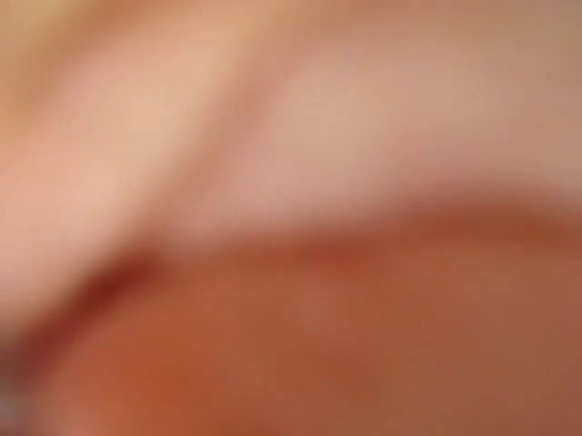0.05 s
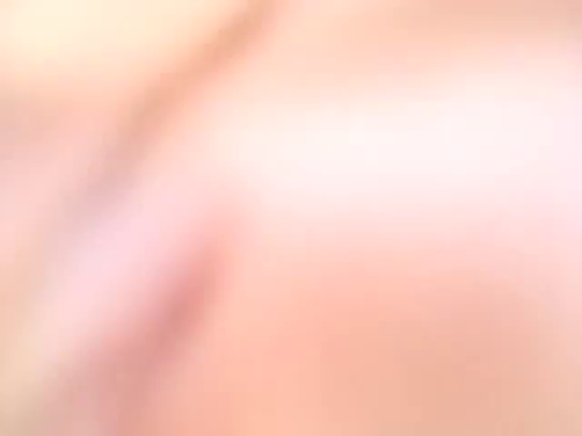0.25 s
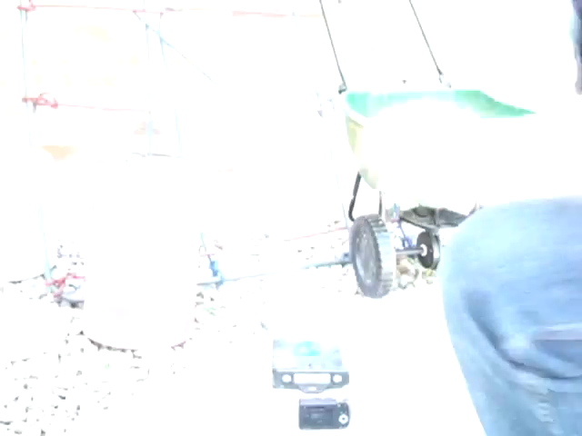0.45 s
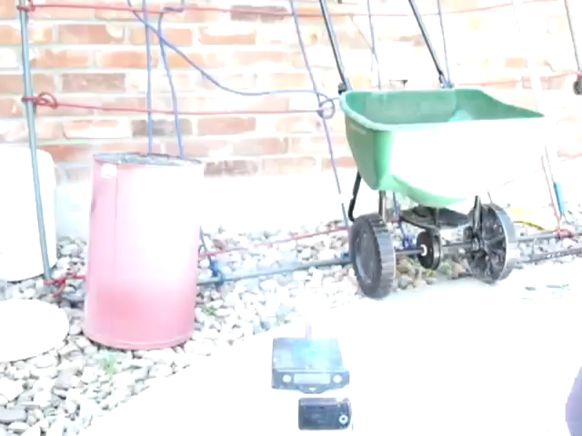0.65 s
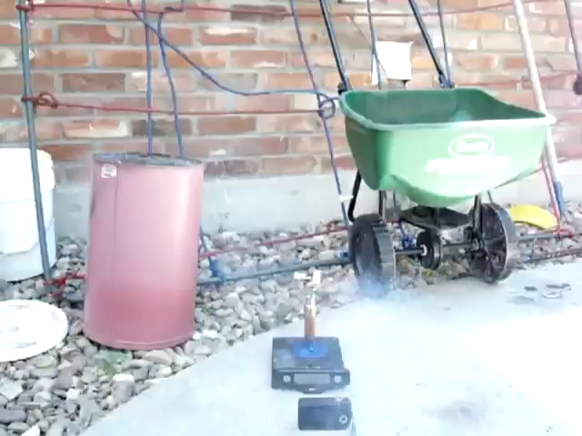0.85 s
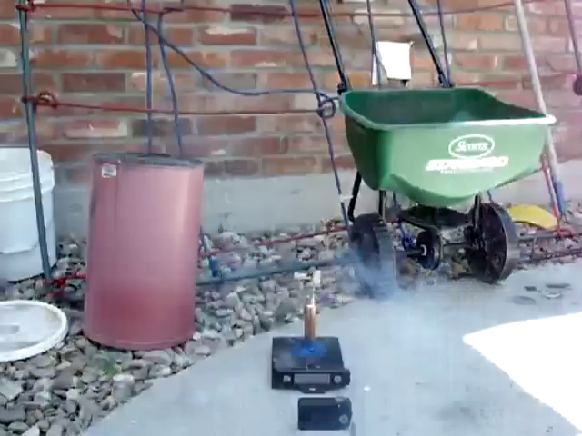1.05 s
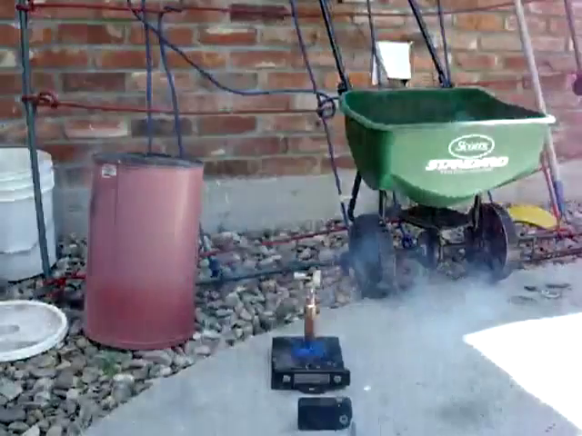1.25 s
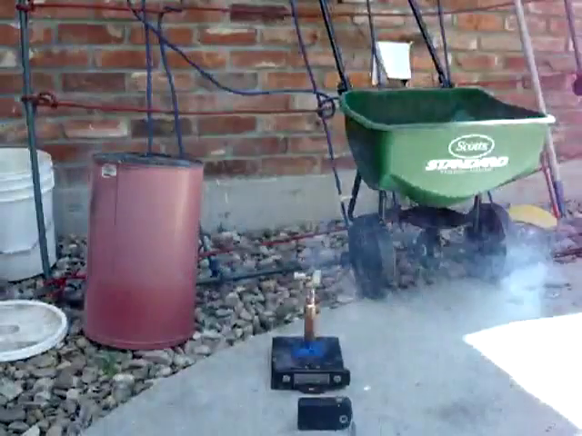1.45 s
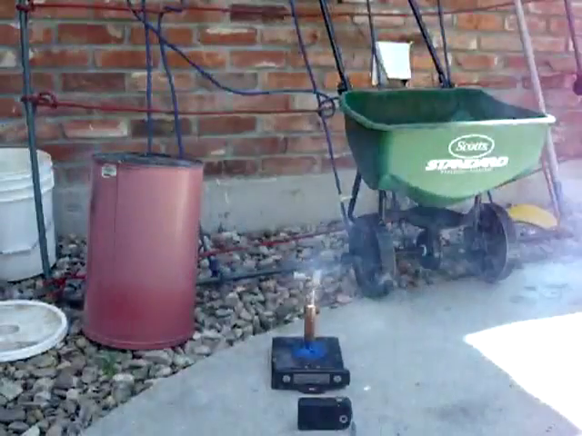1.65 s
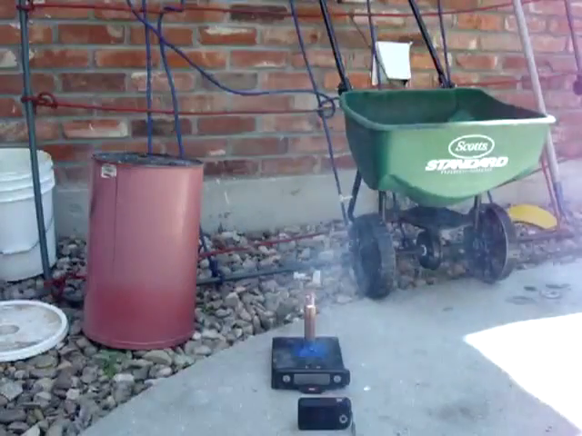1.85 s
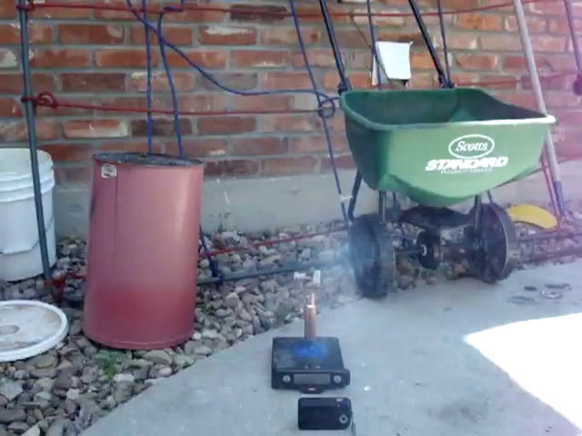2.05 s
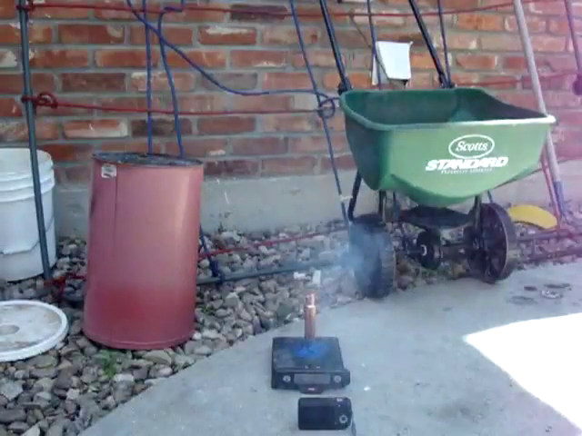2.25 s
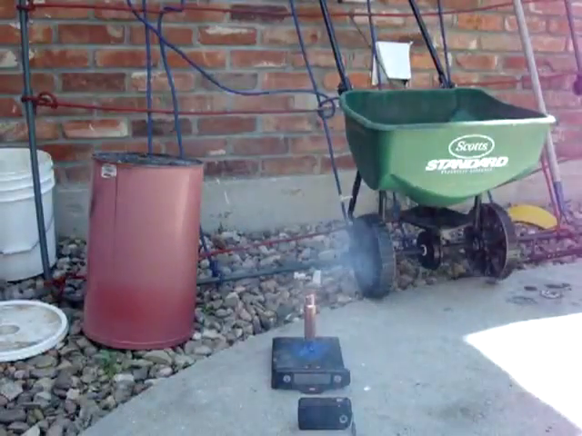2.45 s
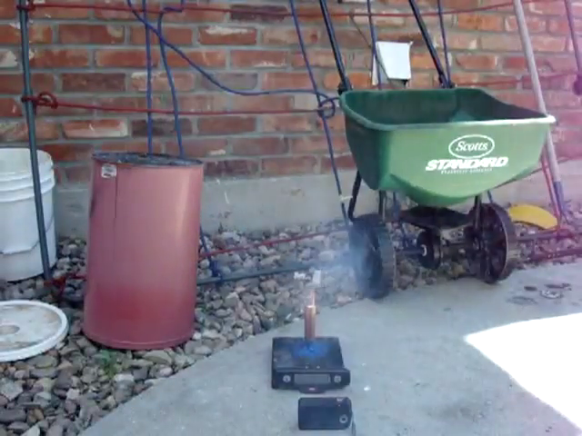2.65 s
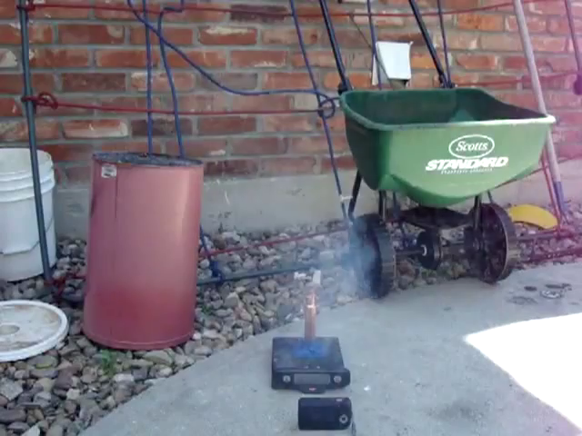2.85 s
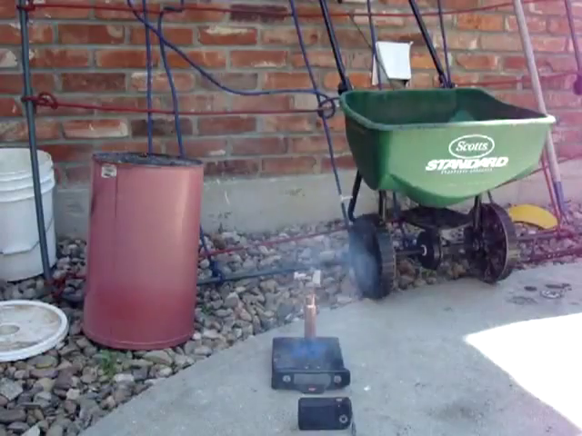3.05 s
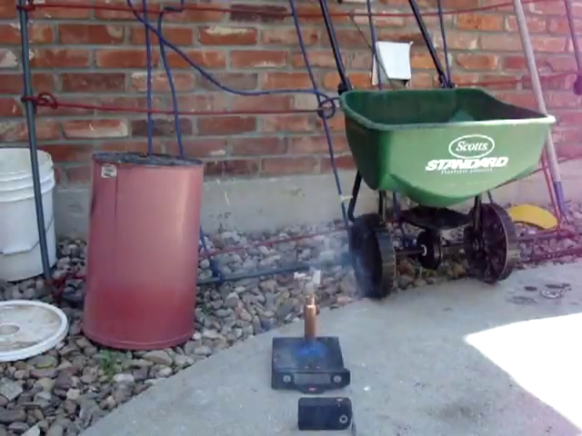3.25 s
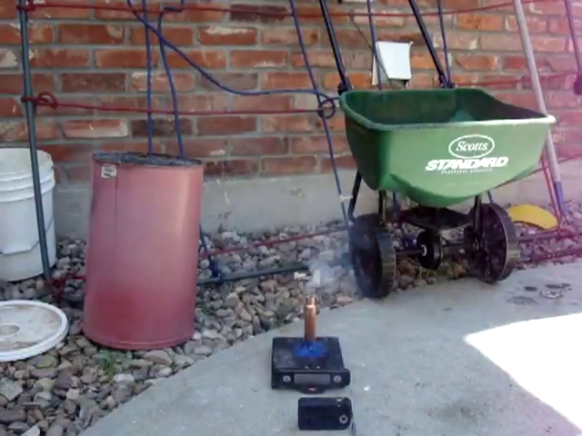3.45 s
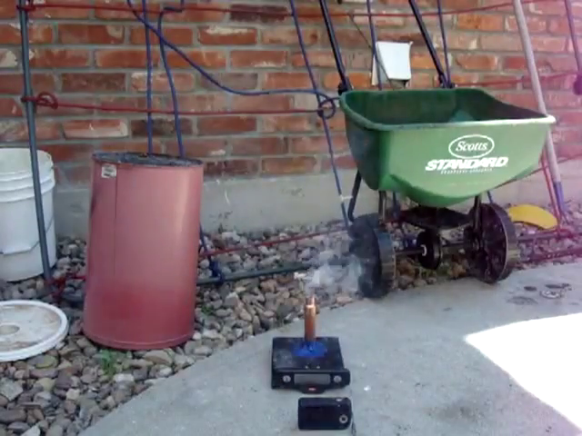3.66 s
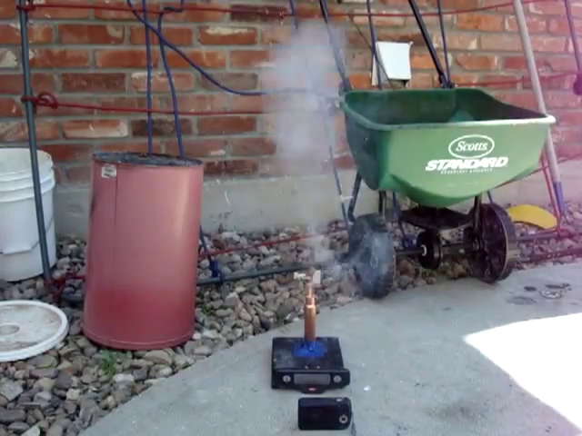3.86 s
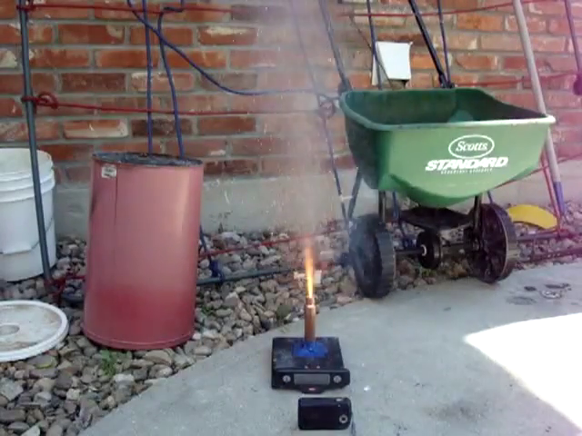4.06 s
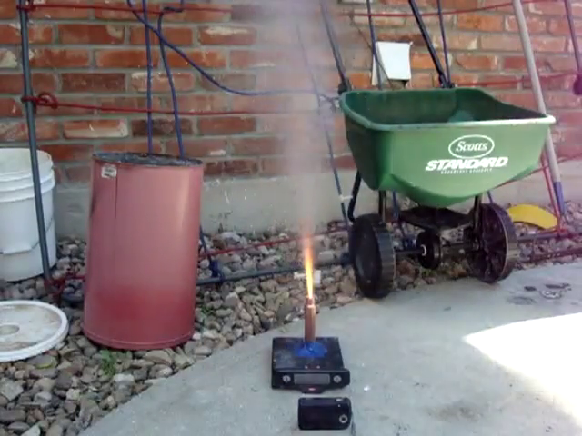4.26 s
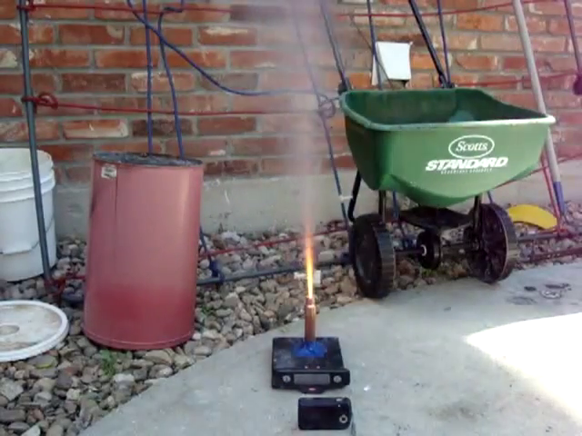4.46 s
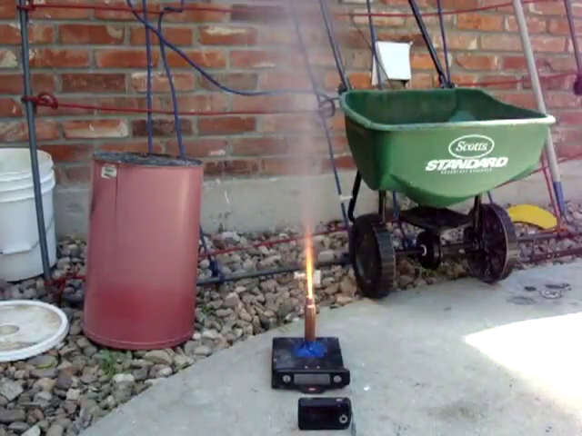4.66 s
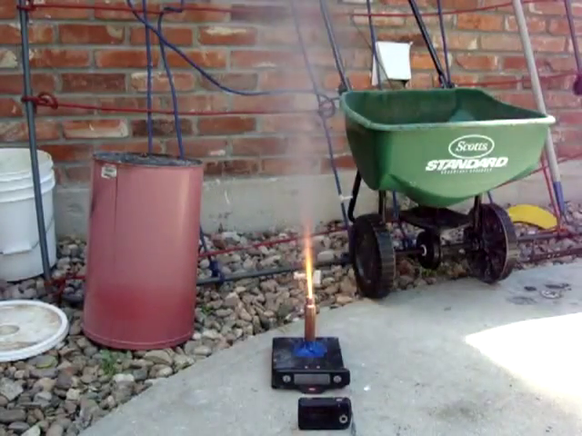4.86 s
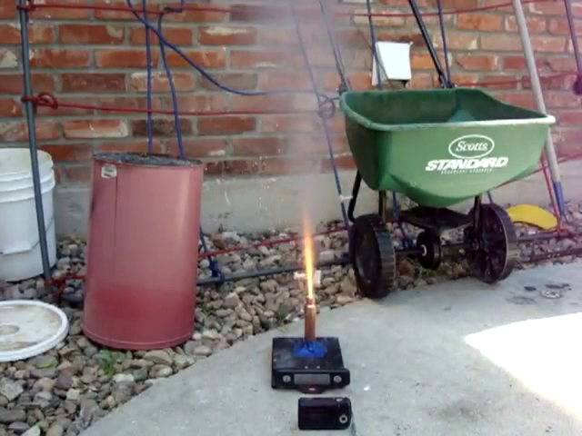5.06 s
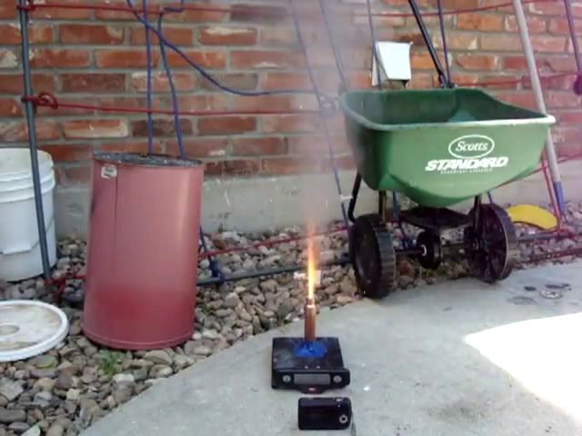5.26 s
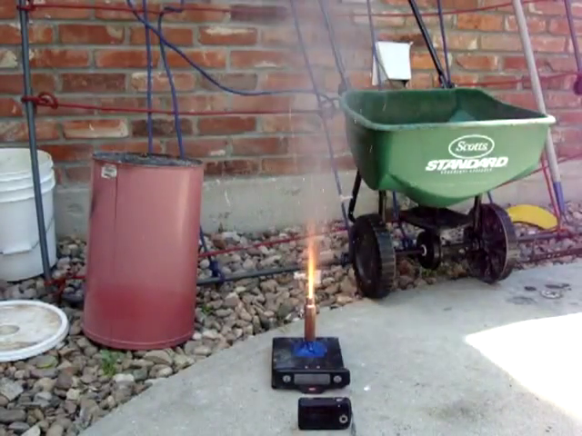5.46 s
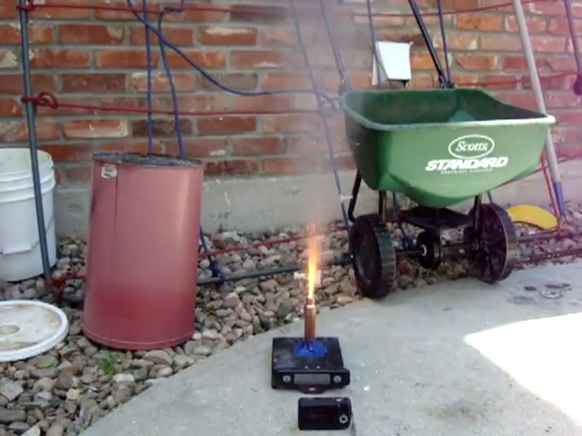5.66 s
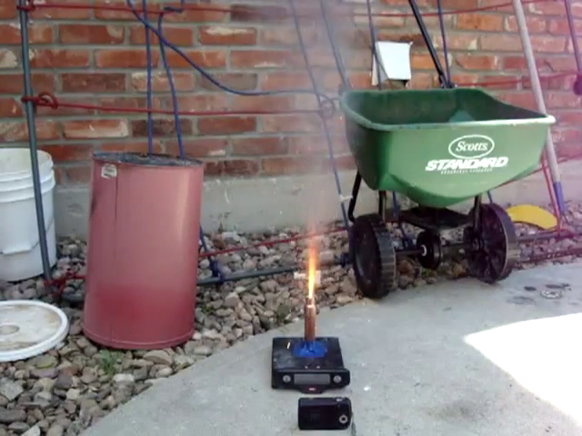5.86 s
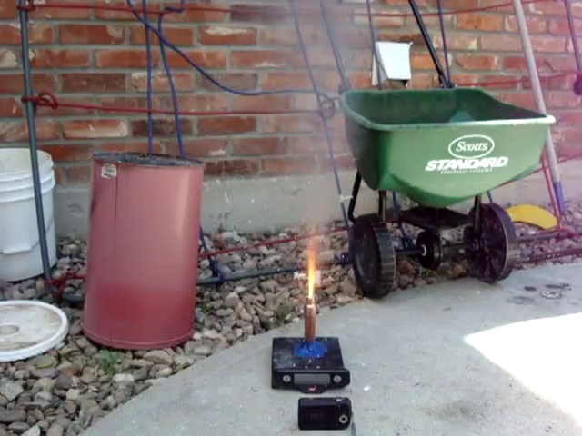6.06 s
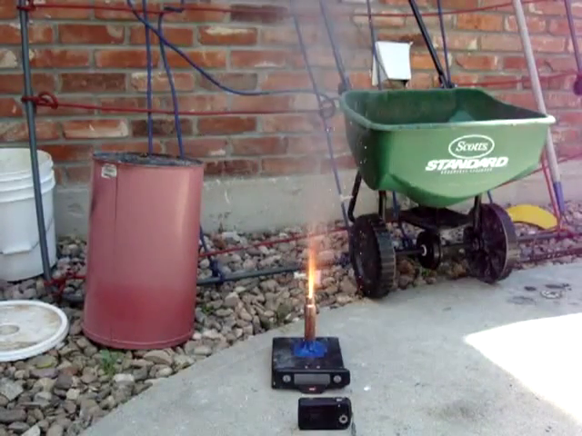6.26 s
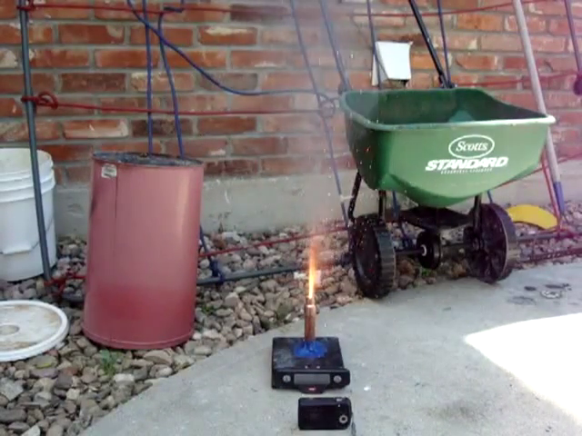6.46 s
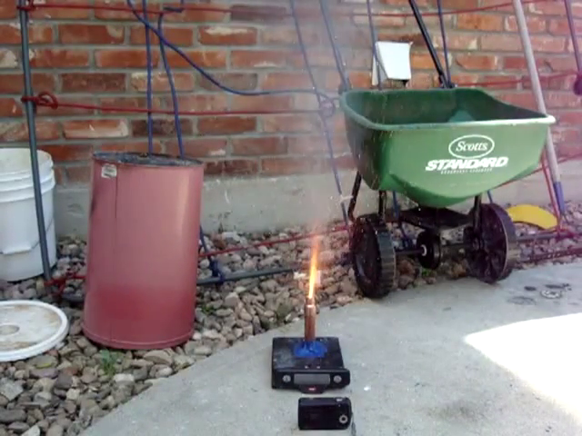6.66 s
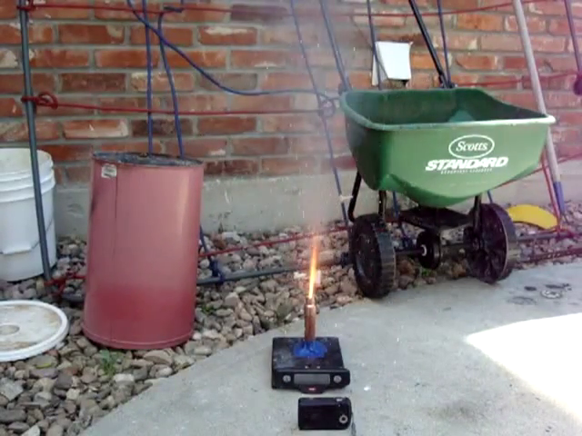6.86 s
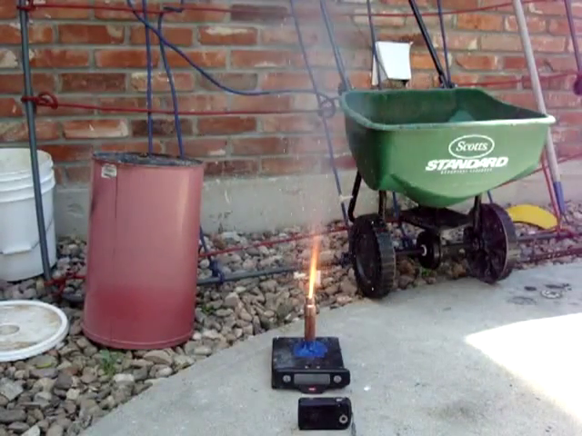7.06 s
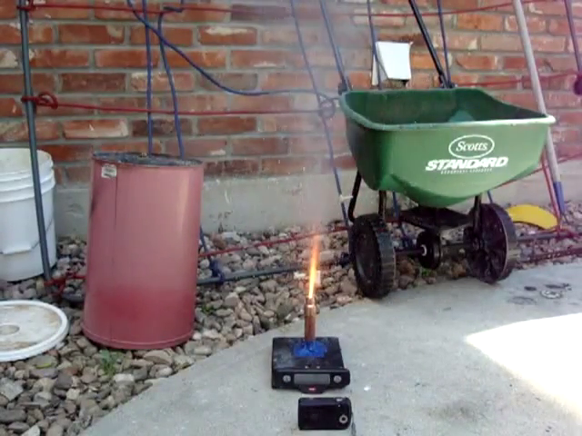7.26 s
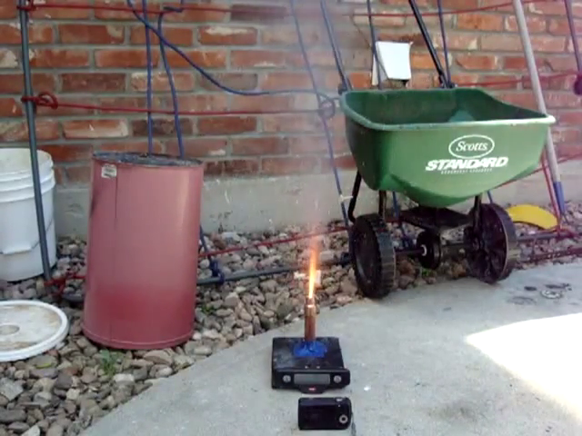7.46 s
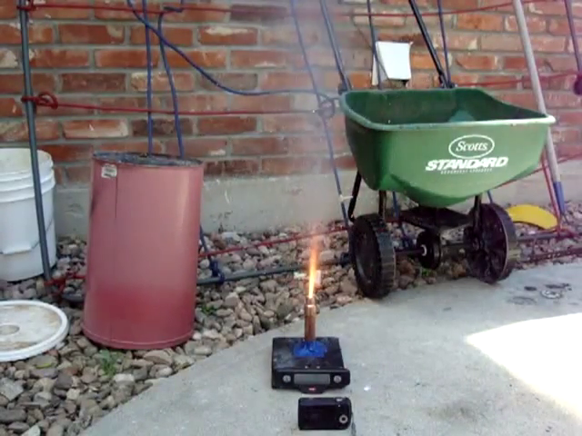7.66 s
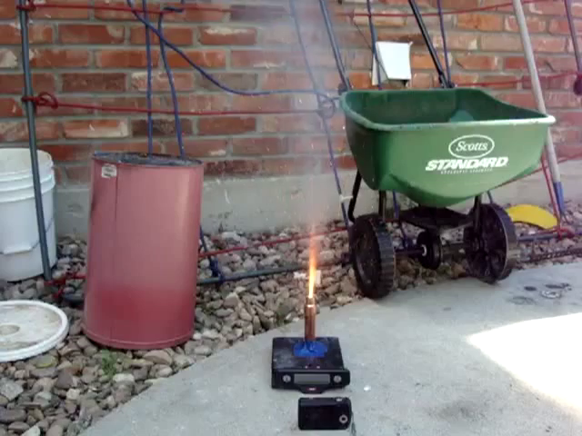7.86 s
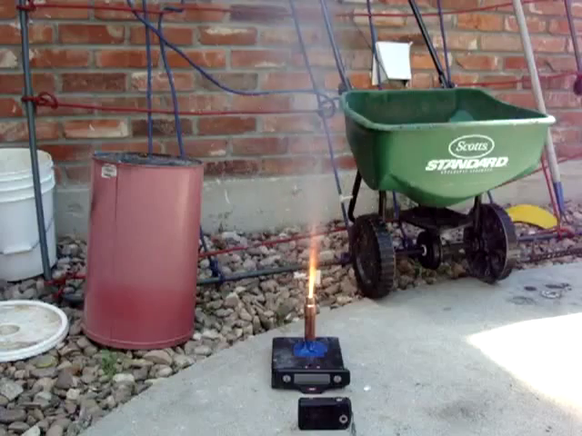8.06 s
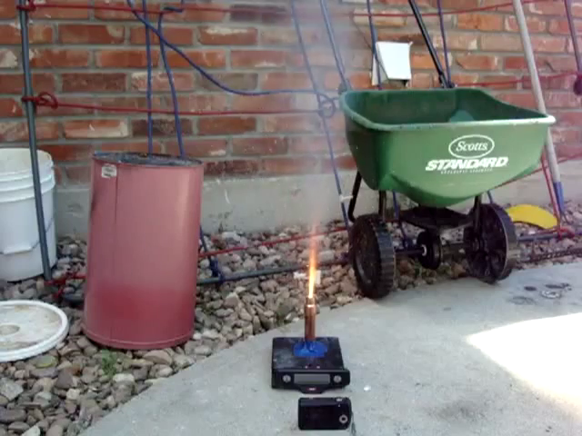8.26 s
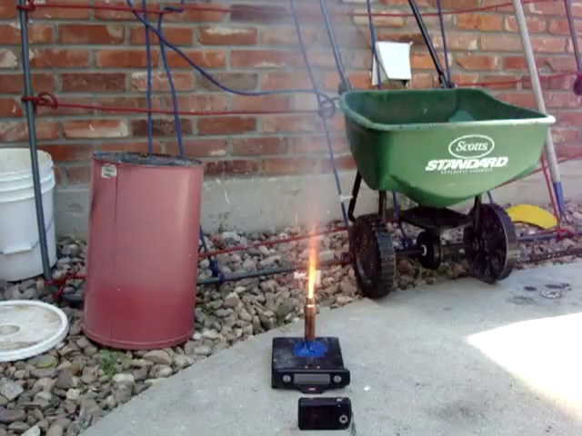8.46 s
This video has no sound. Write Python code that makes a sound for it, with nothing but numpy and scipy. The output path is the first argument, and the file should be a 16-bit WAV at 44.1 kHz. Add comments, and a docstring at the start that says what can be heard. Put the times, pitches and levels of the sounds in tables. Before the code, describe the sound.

Fizzing fuse flares and hard footsteps on a patio, a hollow hiss, then a sudden blast and steady roaring jet of burning fuel.

```python
"""Small rocket motor on a patio

Place: a concrete patio beside a brick wall, a small rocket motor fired on a scale, one microphone.
The fuse, spitting noise in flares, hisses while someone steps and shuffles away: bursts into sole modes, crushed grit.
It burns down into the hollow nozzle, where resonances colour the hiss; then a push of gas and a blast.
The jet lights with a sudden bright, sputtering hiss and roar, shaped from noise and specks.
Far off, the hum of the yard sinks away; electrical bumps and a 30 Hz ripple, probably the camera's supply, are added."""
import sys
import numpy as np
from scipy import signal
from scipy.fft import rfft, irfft, next_fast_len
from scipy.io import wavfile

SR = 44100
rng = np.random.default_rng(int(sys.argv[2]) if len(sys.argv) > 2 else 0)


def invert_db(x):
    """Field ratio 10**(x/20) for x, a level in decibels (scalar or array-like)."""
    u = np.asarray(x, float) / 20
    return 10 ** u


def int16_out(signal):
    """Quantize to a 16-bit WAV file."""
    q = np.round(np.clip(np.atleast_2d(signal).T, -1, 1) * 32767)
    wavfile.write(sys.argv[1], SR, q.astype(np.int16))


N = 375732

# All *_COLOUR tables are relative spectra: (frequency [Hz], density [dB per Hz])

# The jet: (time [s], hiss level [dB], roar level [dB])
JET_LEVELS = [(3.876, -40, -40), (3.887, -30, -34), (3.891, -18.5, -28), (3.97, -12.5, -32),
              (4.07, -16.5, -33), (4.14, -15, -35), (4.22, -17, -37.5), (4.57, -21, -41),
              (4.9, -19.5, -34.5), (5.15, -19, -32.5), (5.8, -17.5, -28), (6.8, -17.5, -30.5),
              (7.8, -16, -28), (8.0, -17.5, -28.5), (8.52, -17, -30.5)]
JET_HISS_COLOUR = [(760, -22), (1300, -6), (1830, 3), (2180, 1.5), (2500, 4.5), (2840, 1.5), (3230, 6.5),
                   (3540, 4.5), (4020, 7), (6000, 5), (8940, 5.5), (9900, 4.5), (12900, -77), (21800, -120)]
JET_ROAR_COLOUR = [(59, -65), (100, -22), (233, -9.5), (284, -14.5), (334, -6), (380, -5), (417, -9.5),
                   (479, -4), (647, -6), (710, 0), (762, -3), (1310, -2.5), (1600, -0.5), (2080, -10.5),
                   (3520, -120)]
# What rings along with the jet: (frequency [Hz], width [Hz], lift [dB])
JET_RINGING = [(271, 22, 4), (355, 38, 5), (867, 18, 5), (1054, 38, 5), (1191, 32, 5), (1600, 59, 4),
               (1766, 30, 4), (1884, 30, 3), (2000, 50, 5), (2573, 25, 5), (2709, 38, 4), (3270, 40, 2.5),
               (3950, 59, 2.5), (4149, 50, 2), (4639, 38, 2.5), (4855, 50, 2), (5066, 54, 2),
               (6292, 54, 2.5), (6454, 48, 3), (8252, 48, 2.5)]
# Lumps of fuel chuff in the roar: (time [s], lift before the swell's own height [dB])
CHUFFS = [(4.77, -4), (5.18, 10), (5.41, 6), (5.74, 0.5), (5.84, 0), (6.19, 0), (7.56, 1), (7.73, 3),
          (7.87, 7.5)]
CHUFF_RISE_S, CHUFF_FALL_S = 0.011, 0.021   # time constants
HISS_FOLLOWS = 0.12   # share of the roar's dB swing that the hiss takes up

# The grain catching fire: (time [s], dull push level [dB], blast in the nozzle level [dB])
PUFF_LEVELS = [(3.875, -47, -34), (3.886, -29, -24), (3.891, -28.5, -16), (3.93, -28, -19),
               (3.96, -30, -18), (3.99, -45, -42), (4.1, -64, -43), (4.3, -70, -51)]
# Resonances of the blast: (frequency [Hz], width [Hz], relative gain [dB])
BLAST_RESONANCES = [(1860, 200, -4), (2420, 350, -6), (4620, 510, -2.5)]

# Fuse flaring up and sagging: (time [s], fine fizz level [dB], hiss level [dB], sag [dB per s])
FLARES = [(.17, -42, -39, 11), (.26, -43, -43, 23), (.38, -37.5, -38, 42), (.53, -35.5, -34.5, 20),
          (.72, -38.5, -38.5, 0), (1.13, -34, -34.5, 23), (1.45, -48, -44, 24), (1.87, -33.5, -36, 30),
          (2.03, -35, -39, 39), (2.34, -38, -41.5, 25), (2.49, -36.5, -41, 41), (2.8, -33.5, -36, 45),
          (3.08, -40.5, -47, 50), (3.17, -33.5, -47, 200), (3.29, -45, -48, 38)]
FLARE_RISE_S = 0.0074
DOWN_TUBE_S, MUFFLE_S = 3.335, 0.0096   # end of the fade of the flares is DOWN_TUBE_S, its length MUFFLE_S
EMBER_FIZZ_DB, EMBER_HISS_DB = -50, -44   # what is left between flares
FUSE_HISS_COLOUR = [(1710, -47), (2900, -12), (3140, -4.5), (3530, -2.5), (4190, 2), (4830, -2.5),
                    (5200, -3), (6760, -27.5), (11400, -120)]
FUSE_FIZZ_COLOUR = [(3120, -53), (5300, -10.5), (6280, -1.5), (7390, -3.5), (8530, 0), (9900, -5.5),
                    (12900, -52), (21800, -120)]
# Brightest spot of the fuse hiss, early and late: (frequency [Hz], width [Hz], lift [dB])
FUSE_PEAK_EARLY = [(4020, 500, 2.3)]
FUSE_PEAK_LATE = [(4780, 600, 4.6)]
CLIMB_FROM_S, CLIMB_S = 0.64, 1.6   # start and length of the crossfade from early to late
# Hollow hiss in the nozzle: (time [s], level [dB])
HOLLOW_LEVELS = [(0, -49), (.15, -46), (.19, -39), (2.9, -40), (3.25, -38.5), (3.7, -38), (3.875, -34)]
# Resonances of the hollow nozzle: (frequency [Hz], width [Hz], relative gain of each of two passes [dB])
NOZZLE_RESONANCES = [(1697, 410, 2), (2475, 1120, 1)]

# Shoes landing on concrete: (time [s], thud peak [dB], slap against thud [dB],
# heel weight [dB per octave below 420 Hz], contact t60, at least 0.01 [s])
STEPS = [(0.952, -19, -23, 13, 0.095), (0.962, -17, -20, 23, 0.08), (.979, -19, -0.5, 8, 0.1),
         (1.349, -9, -15, 5, 0.096), (1.364, -12, 1, -1, 0.076), (1.444, -22, -13, -11, .04),
         (1.474, -17.5, -24, -25, 0.03), (1.509, -19.5, -13, -13, 0.062), (1.524, -20, -17, -14, 0.033),
         (1.549, -25, -15, -5, .04), (1.782, -2.5, -11.5, -1, 0.047), (1.822, 9.5, -1.8, -12, 0.021),
         (1.834, -5, -17, -8, 0.055), (1.843, -1, -19, -8, 0.029), (1.857, -21.5, 3, -1, 0.28),
         (2.016, -14, -17, -16, 0.022), (2.084, -15, 4, -2.5, 0.058), (2.103, -8, -25, -6, 0.074),
         (2.115, -14, -23, -4, 0.066), (2.203, -21, -8, 4, 0.041), (2.503, -22.5, 2.5, 9, 0.096),
         (2.85, -15, -20, 22, 0.037), (2.87, -18, -20, 4, .06), (2.887, -8.5, -9, -17, 0.059),
         (2.922, -12, -4.5, -12, .05), (2.938, -8.5, -31, -16, 0.069), (2.961, -12.5, -12, -6, 0.044)]
# Modes of the sole: (frequency [Hz], level before heel weight [dB], t60 [s])
SOLE_MODES = [(115, -43, 0.04), (225, -19, 0.034), (374, -2.5, 0.046), (468, 0.5, 0.018), (655, 4, 0.0094),
              (870, -11, 0.017)]
SLAP_HZ, SLAP_OCTAVES_PER_DB = 1390, .02   # at a peak of 0 dB; harder landings slap brighter
# A sole skids and sprays grit: (time [s], length [s], level [dB])
SKIDS = [(0.972, .035, -33), (1.779, .032, -26.5)]
SKID_COLOUR = [(1200, -25), (1900, -3), (3200, -1), (4600, -6), (6500, -5), (9900, -13), (12900, -50),
               (21800, -120)]
# Soles dragging over grit: (time [s], level [dB])
SHUFFLE_LEVELS = [(0.0, -42), (.17, -40.5), (.69, -37), (1.49, -36), (2.95, -40), (3.11, -43), (3.9, -41.5)]
GRIT_COLOUR = [(76, -42), (130, -16), (184, -3), (303, -0.5), (424, 0), (682, -0.5), (805, -2), (1700, -3),
               (2060, -26), (2490, -1.5), (2800, -21), (3640, -41), (6160, -120)]
# One heavy slide of a foot: (time [s], level [dB])
SLIDE_LEVELS = [(2.76, -53), (2.786, -49), (2.834, -38), (2.86, -33.5), (2.94, -20.5), (2.98, -33),
                (3.02, -38), (3.06, -48)]
SLIDE_COLOUR = [(88, -44), (150, -14), (210, 3), (297, -6.5), (396, 1.5), (1600, -19.5), (2080, -51),
                (3520, -120)]

# Hum of the yard, sinking under the jet: (time [s], level [dB])
YARD_LEVELS = [(0.0, -47), (.45, -46), (1.07, -43), (1.9, -49.5), (3.0, -41.5), (3.89, -49), (4.05, -55),
               (4.48, -62.5), (8.52, -68)]
YARD_COLOUR = [(26, -43.5), (45, -12.5), (109, -3.5), (171, -11.5), (286, -16), (312, -20), (444, -10),
               (478, -13), (1020, -9.5), (1170, -14), (1500, -32), (1950, -54), (3300, -120)]
# A far drone stands out of the hum: (frequency [Hz], width [Hz], lift [dB])
FAR_DRONE = [(104, 7.6, 6.5)]

# Electrical sags, probably of the camera's supply:
# (sag time [s], return time [s], return before swell height [dB])
SUPPLY_SAGS = [(-.14, .068, -34), (.745, .965, -38), (1.647, 1.663, -48), (2.36, 2.47, -37),
               (3.15, 3.465, -41), (3.75, 3.955, -24), (4.64, 4.873, -38), (5.54, 5.77, -35),
               (6.16, 6.375, -50), (7.04, 7.274, -36), (7.94, 8.165, -40)]
SAG_DB, DIP_DB = -41, -44.5   # before swell height; a weaker return makes the sag shallower too
SAG_RISE_S, BACK_RISE_S, DIP_RISE_S, DIP_AFTER_S = .008, .016, .016, .135   # one more dip follows each return
RIPPLE_HZ, RIPPLE_SHARPNESS = 30, 9
RIPPLE_DB, RIPPLE_SAGGING_DB = -62.5, 7.5   # mean level, and its lift during a sag


def rms_one(x):
    """Scale to unit power."""
    return x / np.sqrt(np.mean(x ** 2) + 1e-20)


def gains(rows):
    """Level columns as gains per sample, silent outside the table."""
    times, *columns = np.transpose(rows)
    t = np.arange(N) / SR
    return [invert_db(np.interp(t, times, column, left=-200, right=-200)) for column in columns]


def drift(rate):
    """Slow chance with spread 1, changing about rate times a second."""
    r = np.exp(-40 * np.pi * rate / SR)   # the walk runs at SR / 20
    chance = rng.standard_normal(N // 20 + 4002)
    slow = signal.lfilter([1], [1, -2 * r, r * r], chance)[4000:]   # skip the settling
    return np.interp(np.arange(N) / 20, np.arange(len(slow)), rms_one(slow - slow.mean()))


def swell(t, rise, fall):
    """Quick rise and slower fall after t = 0; peaks near 0.7 with the settings used here."""
    t = np.maximum(t, 0)
    return (1 - np.exp(-t / rise)) * np.exp(-t / fall) * 2


def grains(per_s, spread_db):
    """Random clicks of either sign, a few of them large; rms 1."""
    sizes = invert_db(spread_db * np.minimum(rng.exponential(1, N), 3.2)) * rng.choice([-1, 1], N)
    return rms_one(sizes * (rng.random(N) < per_s / SR))


def coloured(source, spectrum, patchy_db):
    """Shape the spectrum, then let overlapping bands half an octave apart flicker on their own; rms 1."""
    hz, level_db = np.transpose(spectrum)
    size = next_fast_len(N)
    octave = np.log2(np.arange(size // 2 + 1) * SR / size + 1)
    shaped = rfft(source, size) * invert_db(np.interp(octave, np.log2(hz), level_db))
    out = 0
    for centre in np.arange(np.log2(hz[0]), np.log2(min(hz[-2], SR / 4)) + .5, .5):
        share = np.clip(1 - 2 * np.abs(octave - centre), 0, 1)
        out = out + invert_db(patchy_db * drift(13.0)) * irfft(shaped * share, size)[:N]
    return rms_one(out)


def resonances(x, peaks):
    """Parallel two-pole resonances, signs alternating."""
    out = 0
    for k, (hz, width, level_db) in enumerate(peaks):
        r = np.exp(-np.pi * width / SR)
        gain = (-1) ** k * invert_db(level_db) * (1 - r * r) / 2
        out = out + gain * signal.lfilter([1, 0, -1], [1, -2 * r * np.cos(2 * np.pi * hz / SR), r * r], x)
    return out


def lifted(x, peaks):
    """Narrow peaks raised out of a noise."""
    hz = np.arange(N // 2 + 1) * SR / N
    lift_db = sum(level_db / (1 + (2 * (hz - f) / width) ** 2) for f, width, level_db in peaks)
    return irfft(rfft(x) * invert_db(lift_db), N)


def jet():
    """Turbulent noise and burning specks; uneven burning shakes the roar more than the hiss."""
    t = np.arange(N) / SR
    hiss_gain, roar_gain = gains(JET_LEVELS)
    sputter = drift(40) + 0.1 * drift(5.3)
    chuff_db = sum(db * swell(t - s, CHUFF_RISE_S, CHUFF_FALL_S) for s, db in CHUFFS)
    chuff_db = chuff_db + 0.5 * drift(5.2)
    hiss_gain = hiss_gain * invert_db(HISS_FOLLOWS * chuff_db)
    roar_gain = roar_gain * invert_db(chuff_db)
    specks = grains(400, 3.0)
    hiss_source = (rng.standard_normal(N) + 0.3 * specks) * invert_db(0.58 * sputter)
    roar_source = (rng.standard_normal(N) + 0.86 * specks) * invert_db(2.0 * sputter)
    hiss = coloured(hiss_source, JET_HISS_COLOUR, patchy_db=0.68)
    roar = coloured(roar_source, JET_ROAR_COLOUR, patchy_db=-0.7)
    return patio(hiss_gain * lifted(hiss, JET_RINGING) + roar_gain * lifted(roar, JET_RINGING))


def patio(x):
    """Many small echoes from stones, drum and wall, as decaying noise with a t60 of 0.25 s cut at 0.1 s."""
    t = np.arange(SR // 10) / SR
    echoes = rng.standard_normal(len(t)) * invert_db(-60 * t / 0.25) * (t > .002)
    echoes = echoes / np.sqrt(np.sum(echoes ** 2))
    return x + invert_db(-16) * signal.fftconvolve(x, echoes)[:N]


def puff():
    """A dull push of gas and a hollow, resonant blast as the jet starts."""
    push_gain, blast_gain = gains(PUFF_LEVELS)
    gas = rng.standard_normal(N)
    band = signal.butter(2, [175, 600], "band", fs=SR, output="sos")
    push = rms_one(signal.sosfilt(band, gas))
    return push_gain * push + blast_gain * rms_one(resonances(gas, BLAST_RESONANCES))


def fuse():
    """Spitting powder in the open; its flares are muffled once the burn is down the tube of the nozzle."""
    fizz_gain, hiss_gain = flares()
    hollow_gain, = gains(HOLLOW_LEVELS)
    spit = rng.standard_normal(N) + 0.3 * grains(600, 4.8)
    spit = spit * invert_db(0.5 * drift(38) + 0.84 * drift(17))
    # the brightest spot of the hiss climbs as the fuse burns down
    late = np.clip((np.arange(N) / SR - CLIMB_FROM_S) / CLIMB_S, 0, 1)
    plain = coloured(spit, FUSE_HISS_COLOUR, patchy_db=0.16)
    early_hiss = rms_one(lifted(plain, FUSE_PEAK_EARLY))
    late_hiss = rms_one(lifted(plain, FUSE_PEAK_LATE))
    hiss = (1 - late) * early_hiss + late * late_hiss
    fizz = coloured(spit, FUSE_FIZZ_COLOUR, patchy_db=0.2)
    hollow = rms_one(resonances(resonances(spit, NOZZLE_RESONANCES), NOZZLE_RESONANCES))
    return fizz_gain * fizz + hiss_gain * hiss + hollow_gain * hollow


def flares():
    """Powers of the flares add up over the embers; returns the gains of fizz and hiss."""
    t = np.arange(N) / SR
    fizz_power, hiss_power = np.zeros((2, N))
    for s, fizz_db, hiss_db, sag in FLARES:
        shape = np.clip((t - s) / FLARE_RISE_S, 0, 1) * invert_db(-sag * np.maximum(t - s, 0))
        fizz_power += (invert_db(fizz_db) * shape) ** 2
        hiss_power += (invert_db(hiss_db) * shape) ** 2
    in_open = np.clip((DOWN_TUBE_S - t) / MUFFLE_S, 0, 1)
    burning = t < HOLLOW_LEVELS[-1][0]
    fizz_gain = burning * np.sqrt(fizz_power * in_open + invert_db(EMBER_FIZZ_DB) ** 2)
    hiss_gain = burning * np.sqrt(hiss_power * in_open + invert_db(EMBER_HISS_DB) ** 2)
    return fizz_gain, hiss_gain


def steps():
    """Each landing is a rough burst of contact into the modes of the sole, with a brighter slap."""
    out = np.zeros(N)
    t = np.arange(SR // 4) / SR
    chance = rng.standard_normal((len(STEPS), len(t)))
    for (s, peak_db, slap_db, heel_db, t60), noise in zip(STEPS, chance):
        contact = noise * (1 - np.exp(-t / 0.0023)) * invert_db(-60 * t / max(t60, .01))
        contact += 0.76 * np.sin(np.pi * np.minimum(t / 0.00042, 1))   # the first firm knock
        thud = 0
        for hz, level_db, ring in SOLE_MODES:
            r, w = invert_db(-60 / (ring * SR)), 2 * np.pi * hz / SR
            weight_db = heel_db * np.log2(420 / hz)   # a heavy heel favours the low modes
            mode = signal.lfilter([0, np.sin(w)], [1, -2 * r * np.cos(w), r * r], contact)
            thud = thud + invert_db(level_db + weight_db) * mode
        slap_hz = SLAP_HZ * 2 ** (SLAP_OCTAVES_PER_DB * peak_db)
        band = signal.butter(2, [slap_hz / 1.6, slap_hz * 1.7], "band", fs=SR, output="sos")
        slap = signal.sosfilt(band, contact * invert_db(-60 * t / 0.16))
        blow = thud / np.abs(thud).max() + invert_db(slap_db) * slap / np.abs(slap).max()
        at = round(s * SR)
        out[at:at + len(t)] += invert_db(peak_db) * blow
    return signal.sosfilt(signal.butter(4, 100, "high", fs=SR, output="sos"), out)


def skids():
    """Short bright sprays of grit: dense clicks and noise, switched on for each skid."""
    t = np.arange(N) / SR
    edge_s = 0.0024
    gain = sum(invert_db(db) * np.clip(np.minimum(t - s, s + length - t) / edge_s, 0, 1) for s, length, db in SKIDS)
    spray = grains(1500, 5.4) + .6 * rng.standard_normal(N)
    return gain * coloured(spray, SKID_COLOUR, patchy_db=-2.5)


def wall(x):
    """A dull smear of echoes from the slab and the brick wall: low-passed decaying noise."""
    t = np.arange(SR // 8) / SR
    scatter = rng.standard_normal(len(t)) * invert_db(-60 * t / 0.13) * (t > .003)
    echoes = signal.lfilter([.3], [1, -.7], scatter)
    echoes = echoes / np.sqrt(np.sum(echoes ** 2))
    return x + invert_db(-16) * signal.fftconvolve(x, echoes)[:N]


def shuffle():
    """Grit crushed in clumps under the soles; once a foot slides with weight on it."""
    grit = (grains(900, 3.3) + 1.5 * rng.standard_normal(N)) * invert_db(2.0 * drift(7.9))
    slide = (0.82 * grains(500, 2.2) + 0.98 * rng.standard_normal(N)) * invert_db(0.85 * drift(40))
    dragging = gains(SHUFFLE_LEVELS)[0] * coloured(grit, GRIT_COLOUR, patchy_db=1.0)
    return dragging + gains(SLIDE_LEVELS)[0] * coloured(slide, SLIDE_COLOUR, patchy_db=2.5)


def yard():
    """Far traffic and air: flickering low noise with a drone raised out of it."""
    hum = coloured(rng.standard_normal(N), YARD_COLOUR, patchy_db=1.5)
    return gains(YARD_LEVELS)[0] * rms_one(lifted(hum, FAR_DRONE))


def supply_bumps():
    """Electrical bumps, probably from the camera's supply, with a 30 Hz ripple that grows during each sag."""
    t = np.arange(N) / SR
    out, sagging = np.zeros((2, N))
    for s, back, back_db in SUPPLY_SAGS:
        sag_db = SAG_DB + min(back_db - SAG_DB, 0)
        out -= invert_db(sag_db) * swell(t - s, SAG_RISE_S, SAG_RISE_S * 1.6)
        out += invert_db(back_db) * swell(t - back, BACK_RISE_S, BACK_RISE_S * 1.9)
        out -= invert_db(DIP_DB) * swell(t - back - DIP_AFTER_S, DIP_RISE_S, DIP_RISE_S * 1.6)
        sagging += np.clip(np.minimum(t - s, back - t) / .03, 0, 1)
    ripple = np.exp(RIPPLE_SHARPNESS * np.cos(2 * np.pi * RIPPLE_HZ * t))
    ripple_db = RIPPLE_DB + RIPPLE_SAGGING_DB * sagging + 0.8 * drift(3.0)
    out += invert_db(ripple_db) * rms_one(ripple - ripple.mean())
    return signal.sosfilt(signal.butter(1, 4.0, "high", fs=SR, output="sos"), out)


def scene():
    """All sources at one microphone, plus the electrical bumps."""
    motor = fuse() + puff() + jet()
    feet = wall(steps() + skids()) + shuffle()
    return (motor + feet + yard() + supply_bumps())[None]


def low_pass(x):
    """Removes everything above the highest recorded frequency."""
    return signal.sosfilt(signal.butter(12, 11230, fs=SR, output="sos"), x)


def record(dry):
    """The microphone signal has its peaks rounded, then its top cut steeply at 10040 Hz."""
    rounded = dry / (1 + (dry / .85) ** 4) ** (1 / 4)
    steep = signal.ellip(12, .5, 85, 10040, fs=SR, output="sos")
    return low_pass(signal.sosfilt(steep, rounded))


dry = scene()
out = record(dry)
int16_out(out)
```